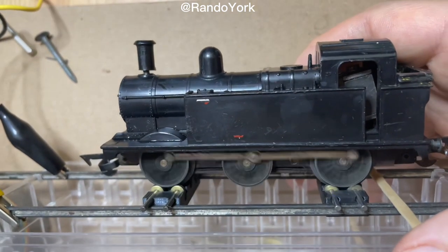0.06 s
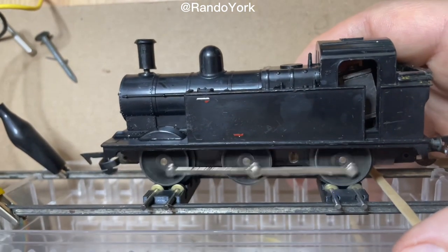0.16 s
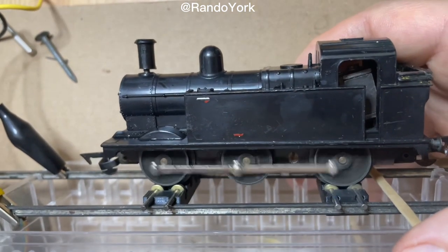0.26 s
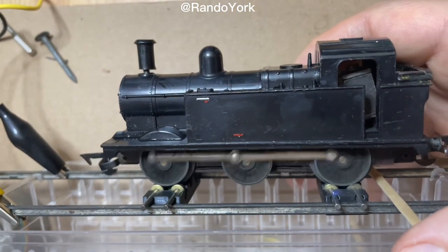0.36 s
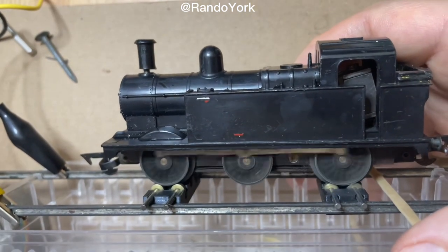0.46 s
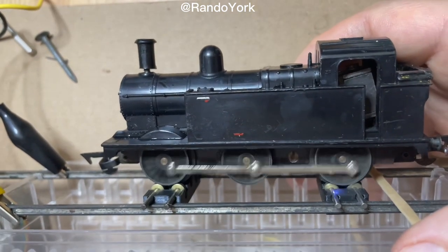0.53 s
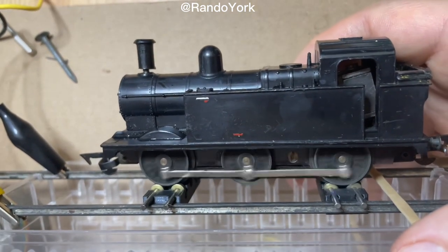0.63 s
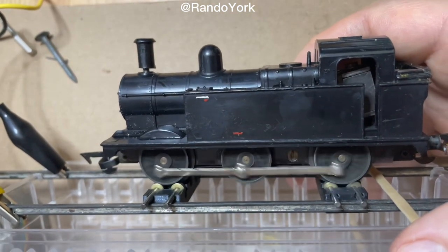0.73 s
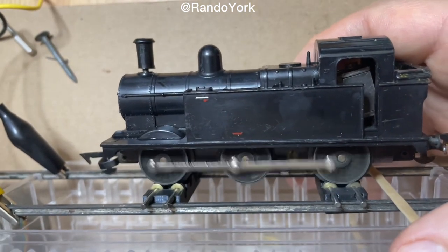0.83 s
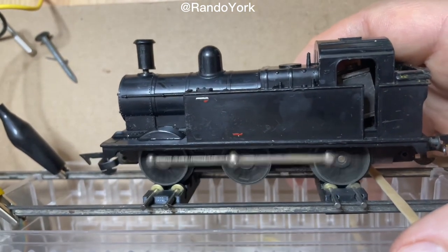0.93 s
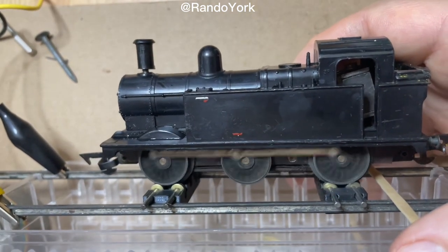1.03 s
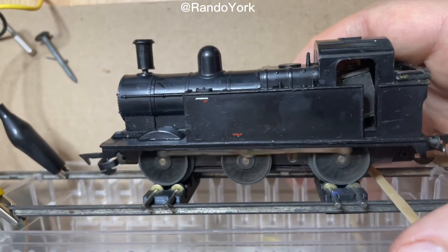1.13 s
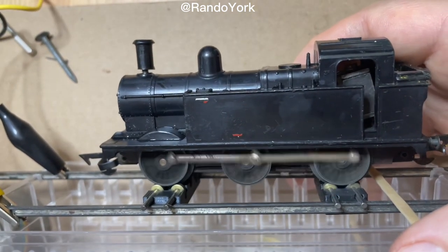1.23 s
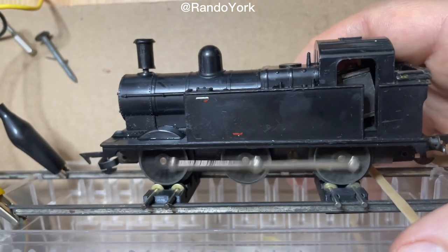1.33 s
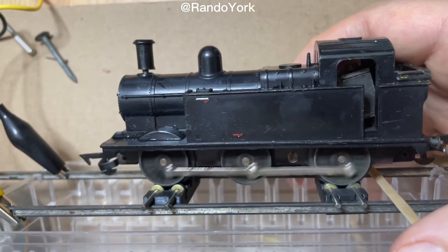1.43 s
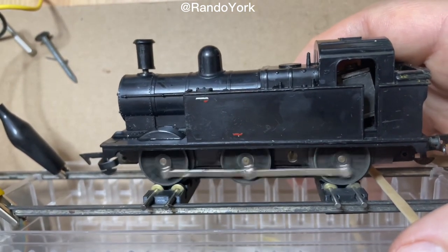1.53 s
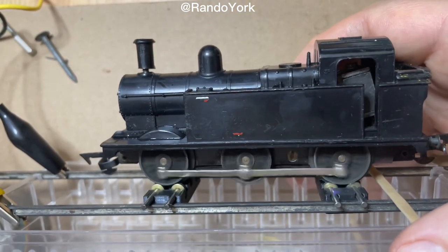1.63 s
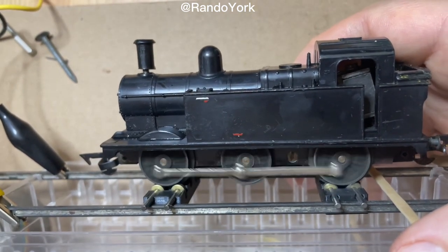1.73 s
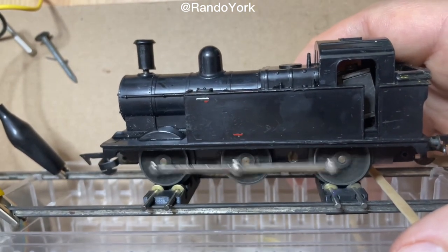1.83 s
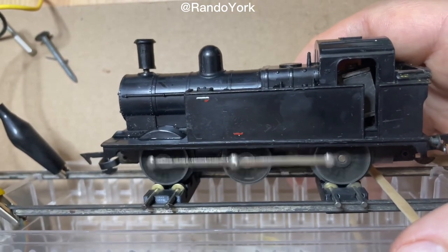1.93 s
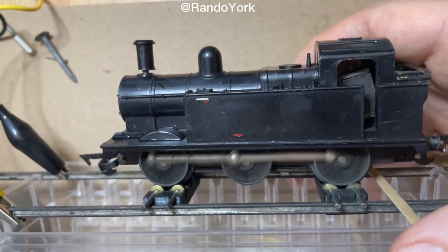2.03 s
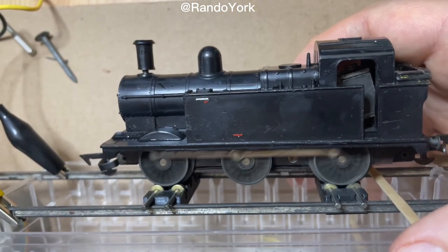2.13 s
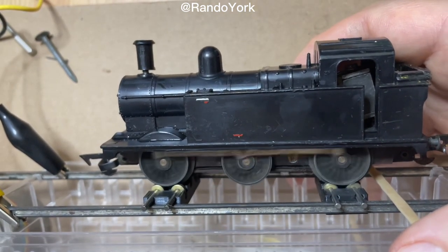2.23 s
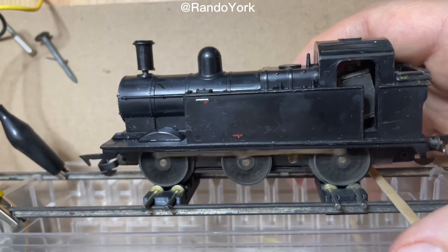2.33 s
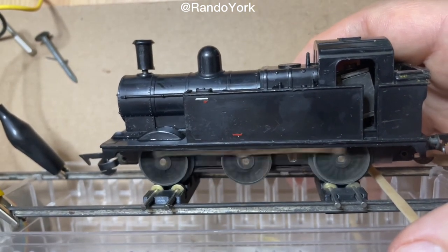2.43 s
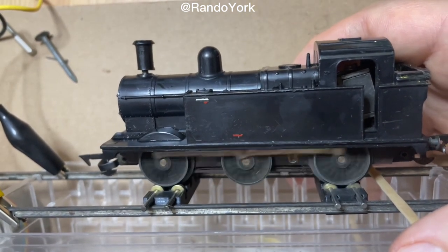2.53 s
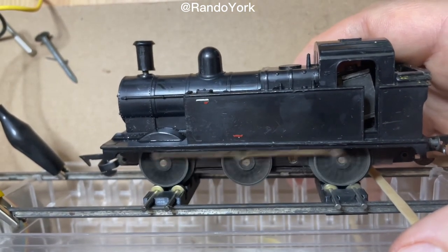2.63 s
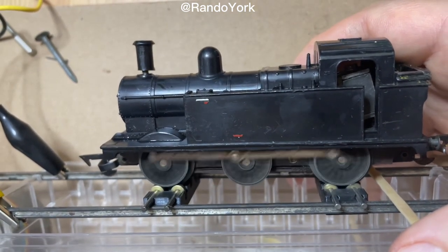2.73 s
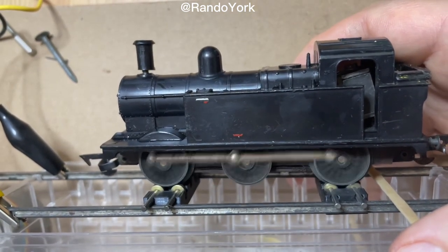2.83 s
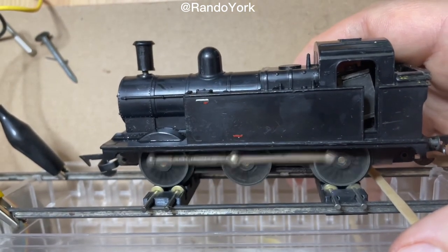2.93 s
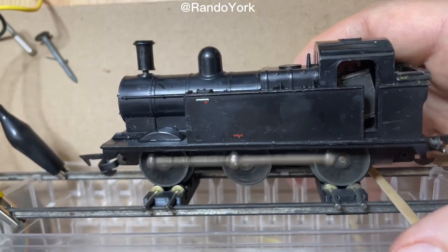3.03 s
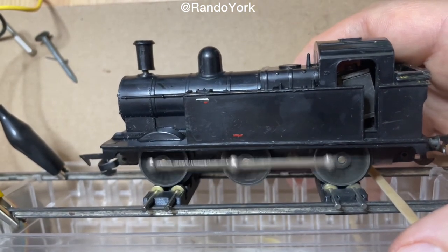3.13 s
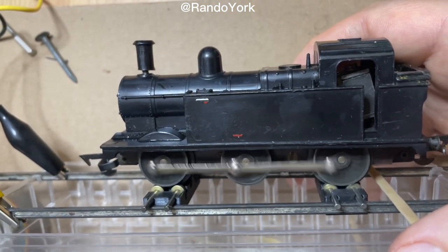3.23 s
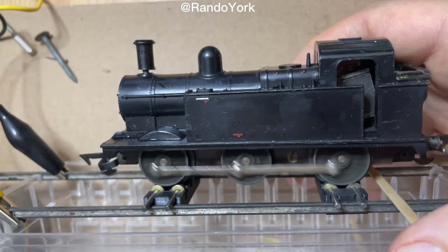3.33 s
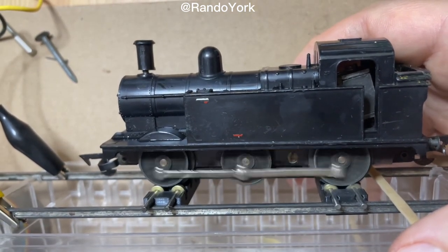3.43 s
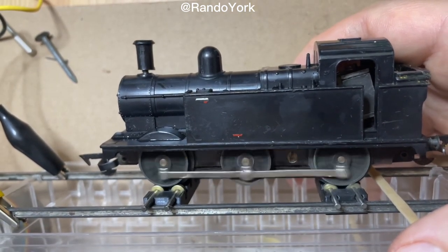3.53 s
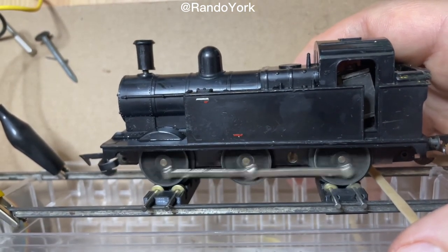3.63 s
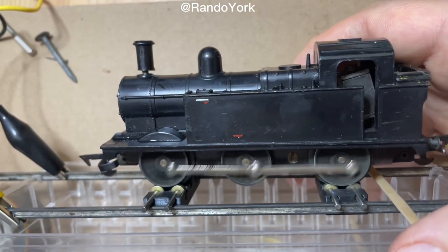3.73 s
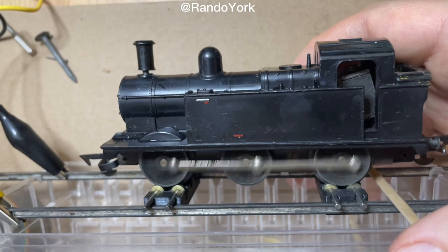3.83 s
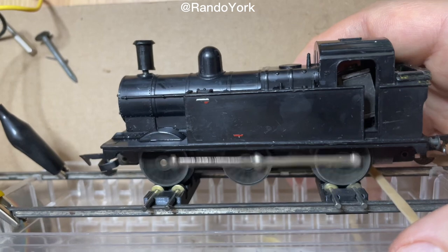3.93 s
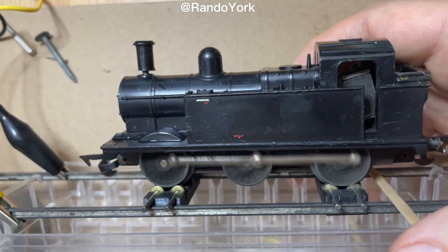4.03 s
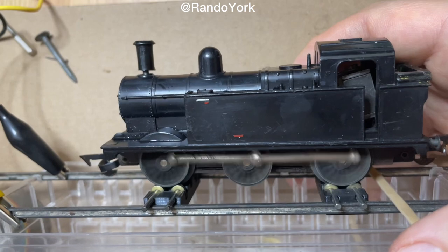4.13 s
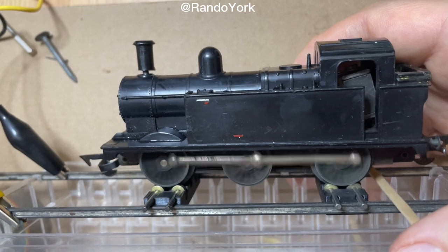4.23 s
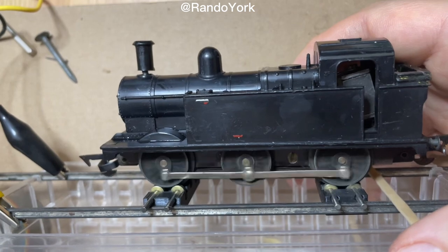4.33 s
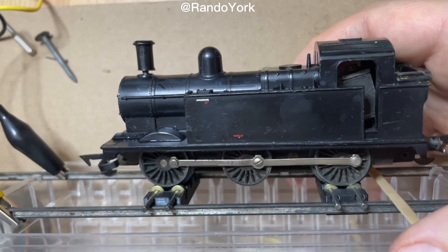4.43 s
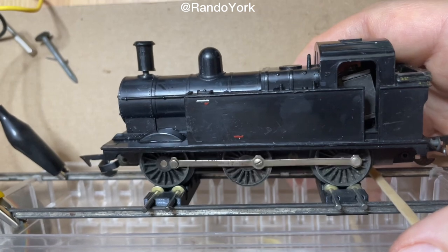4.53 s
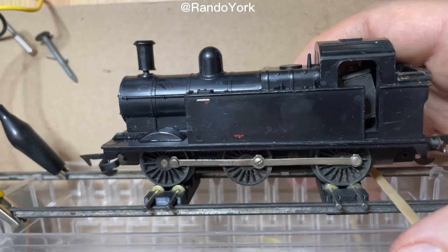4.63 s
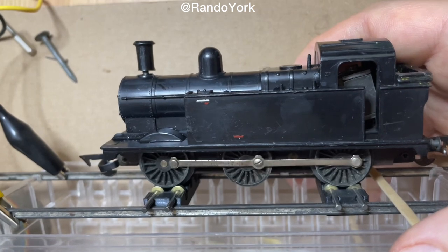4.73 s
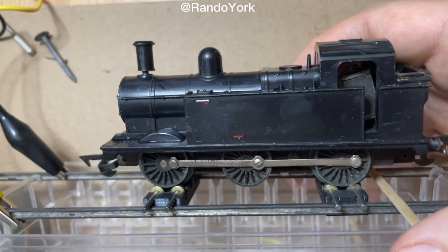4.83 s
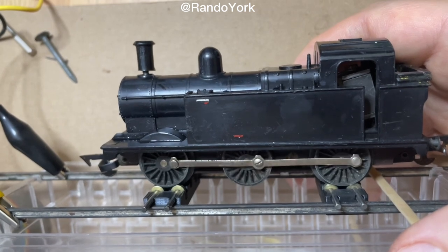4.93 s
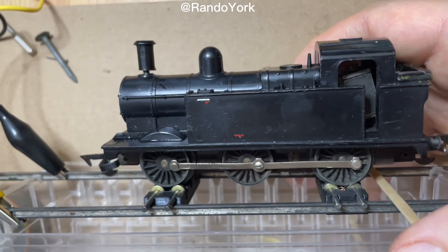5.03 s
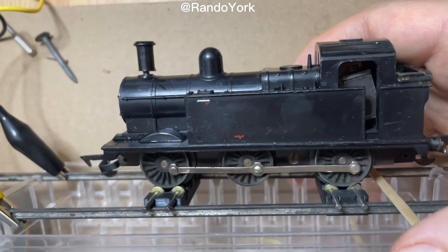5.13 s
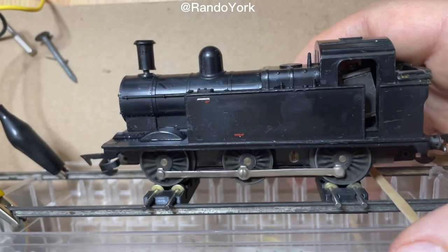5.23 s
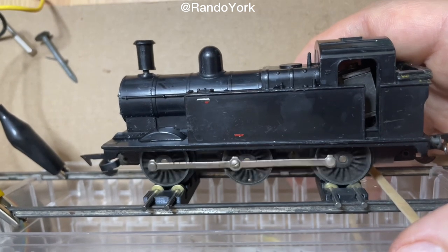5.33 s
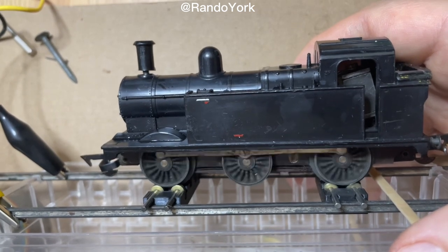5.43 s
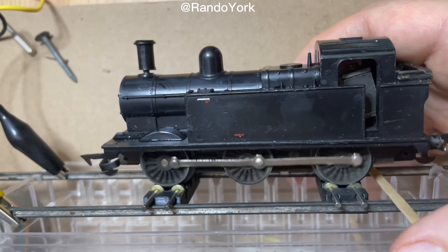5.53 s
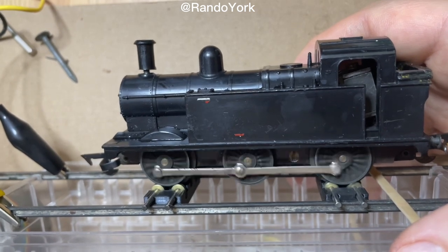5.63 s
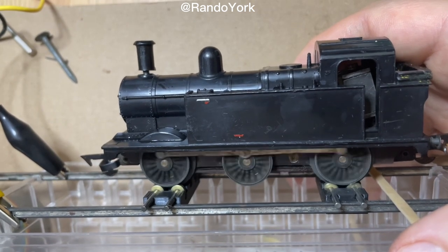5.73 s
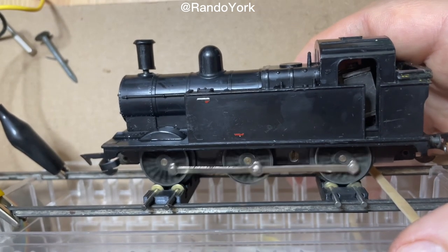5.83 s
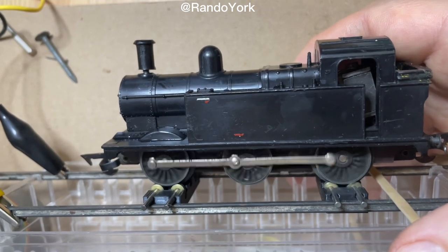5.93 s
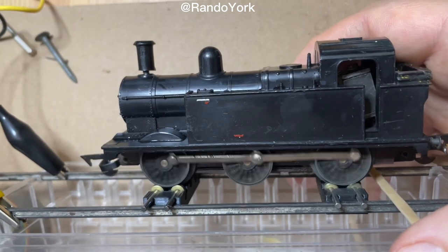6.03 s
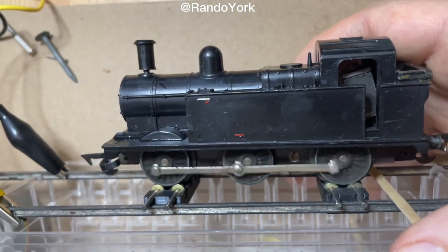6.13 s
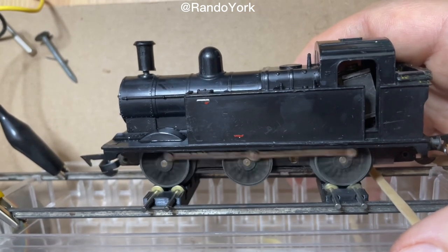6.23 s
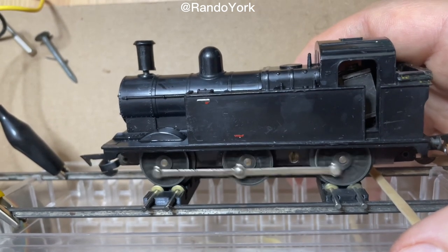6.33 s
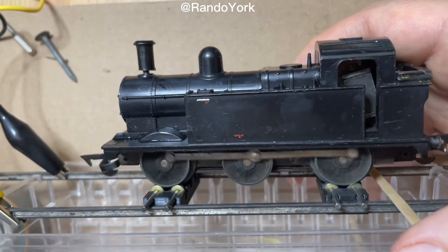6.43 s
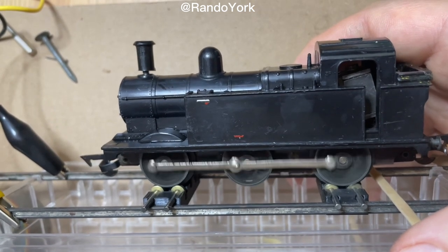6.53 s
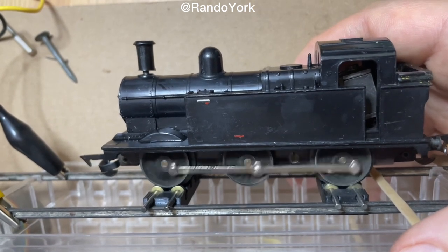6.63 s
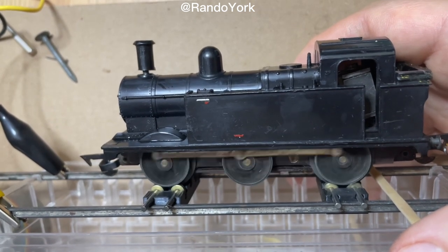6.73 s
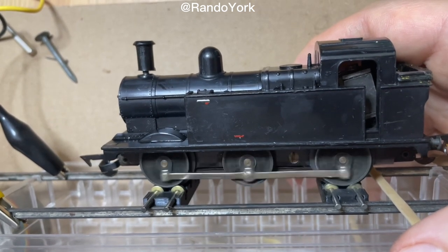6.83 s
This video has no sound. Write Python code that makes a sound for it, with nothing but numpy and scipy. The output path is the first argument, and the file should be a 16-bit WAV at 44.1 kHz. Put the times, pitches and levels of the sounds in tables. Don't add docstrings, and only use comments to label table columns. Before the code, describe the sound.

On an indoor workbench, a small electric model locomotive runs on rollers very close to a stereo phone microphone. Its dry gear rattle and thin motor whine start subdued, then open up and rise slightly. The motor stops abruptly, leaving low rumble and small clicks. After a short groan it restarts backwards, coarse and uneven, with coupling rods knocking as it picks up.

```python
import sys
import numpy as np
from scipy import signal
from scipy.fft import rfft, irfft, next_fast_len
from scipy.io import wavfile
from scipy.ndimage import uniform_filter1d, map_coordinates

SR = 44100
rng = np.random.default_rng(int(sys.argv[2]) if len(sys.argv) > 2 else 0)


def gain_from_db(level_db):
    decades = np.asarray(level_db, float) / 20
    return 10 ** decades


def waveform_to_disk(signal):
    frames = np.transpose(np.atleast_2d(signal))
    scaled = np.clip(frames, -1, 1) * 32767
    samples = np.round(scaled).astype(np.int16)
    wavfile.write(sys.argv[1], SR, samples)


N = 303055

# (time [s], rattle [dB])
RATTLE = [(0, -33), (.4, -31.5), (4.06, -31.5), (4.28, -34.5), (4.378, -48), (4.424, -72), (4.54, -85.5),
          (4.715, -85.5), (4.745, -67), (4.91, -69.5), (4.95, -60), (5.08, -56), (5.2, -42.5), (5.33, -46),
          (5.39, -43), (5.6, -40.5), (6.0, -38), (6.87, -35.5)]
# (time [s], shaft [Hz])
SHAFT = [
    (0, 150),
    (.4, 176),
    (1.2, 180),
    (1.5, 187),
    (2, 187),
    (2.7, 207),
    (3.7, 214),
    (4, 208),
    (4.2, 195),
    (4.4, 160),
]
# (centre [Hz], width [Hz], level [dB])
SHELL = [(1006, 119, 3), (1170, 54, 4), (1471, 70, 3.5), (1662, 103, 1.5), (2030, 37, 0.5),
         (2286, 445, 0.5), (2620, 72, 1), (3093, 133, -1.5), (3403, 190, -3), (3675, 110, -2.5),
         (3830, 34, 0), (4250, 60, -2), (4496, 150, 1.5), (5037, 280, -0.5), (5700, 130, -0.5)]
# (centre [Hz], width [Hz], level [dB])
SHELL_APART = [(1000, 90, 13), (1180, 80, 14), (1430, 70, 7.5), (1900, 120, 0.5), (2650, 150, -47),
               (3300, 250, -4.5), (4200, 200, -9), (5700, 200, -21.5), (6100, 250, -12)]
# (centre [Hz], width [Hz], level [dB])
BOILER = [(473, 36, 1), (430, 60, -11), (510, 40, -9)]
# (centre [Hz], width [Hz], level re boiler [dB])
CAB_TANKS = [(238.6, 69, -8.5), (327, 250, -16.5), (697, 150, -17), (835, 170, -11), (1142, 127, -8.5)]
# (centre [Hz], width [Hz], level [dB])
BRUSH_SPRINGS = [(5956, 190, -0.5), (6093, 82, 0)]
# (frequency [Hz], level [dB])
SUM_COLOUR = [(100, -0.5), (300, -3), (900, -2), (3000, -0.5), (6000, -1.5), (6600, -4.5), (7000, -16.5),
              (7700, -14), (8400, -6.5), (10000, -4.5), (13000, -10), (14100, -22.5), (15950, -19.5),
              (16200, -120)]
# (frequency [Hz], level [dB])
DIFFERENCE_COLOUR = [(100, -10.5), (300, -12.5), (900, -10), (3000, 2), (4900, -7), (5600, 0), (7200, 3.5),
                     (9200, -1), (10600, -31.5), (11700, -20), (13200, -7.5), (14500, -2.5), (15800, -15),
                     (16300, -120)]
# (frequency [Hz], likeness [0-1], lead [rad])
PORT_LIKENESS = [(180, .95, 1.15), (500, 0.94, 0.58), (610, .65, -2), (805, 0.3, -1.5), (1050, 0.3, 0.36),
                 (1480, 0.5, 1.7), (2040, 0.3, -0.35), (2600, .45, .3), (3200, 0.97, 1.2), (3900, 0.5, .1),
                 (5000, 0, 0), (6040, 1, -0.77), (6500, 0.2, -0.39), (8650, 0.17, 1.6)]
# (frequency [Hz], density [dB per Hz])
RUMBLE = [(20, -43), (30, -7), (50, 5.5), (85, 6), (150, -7), (300, -21), (600, -32), (1100, -41),
          (1600, -52.5), (6000, -65), (16000, -82.5)]
# (time [s], ripple depth [0-1], coarseness [dB])
LOAD = [
    (0, 0.21, 0.5),
    (4.4, 0.24, 0.5),
    (4.8, 0.3, -5),
    (5.08, 0.5, 8.5),
    (5.2, 0.64, 0.8),
    (5.9, 0.34, 1.5),
    (6.87, 0.37, -1.5),
]
# (time [s], peak [dB], hollow part [dB], thud part [dB], hollow ring [Hz])
SWITCH = [(4.362, -30, -14, -28, 473), (4.38, -27, -14, -23, 487), (4.401, -38, -15, -25, 487),
          (4.4236, -36.5, -16.5, -13, 487), (4.481, -50.5, 5.5, -10, 1000), (4.51, -62, -3, 23, 425),
          (4.6114, -67.5, 0, 24, 400), (4.638, -76, 1, 28, 422), (4.704, -52, -14, -15, 433),
          (4.7234, -62, 9, -4, 700), (4.7529, -27.5, -2, -10, 567), (4.775, -31, -16, -3, 1000),
          (4.7963, -37.5, -11, 1.5, 622), (4.821, -60, -5, 18, 500), (4.925, -29, -25, -26, 520),
          (4.9351, -28, -17.5, -30.5, 470), (5.019, -44, -7, -8, 700)]
# (time [s], peak [dB], hollow ring [Hz])
RODS = [(5.0472, -50, 566), (5.0864, -34, 1040), (5.097, -30, 1030), (5.109, -26, 850), (5.1232, -26, 1160),
        (5.1647, -30, 486), (5.172, -21.5, 1100), (5.189, -22, 1100), (5.2604, -26, 475),
        (5.338, -22.5, 1180), (5.3764, -22, 460), (5.5277, -27.5, 490), (5.5469, -17.5, 1170),
        (5.6087, -19, 477), (5.8487, -19, 464), (5.8883, -18, 1000), (6.0857, -16, 1060),
        (6.1475, -22, 475), (6.2687, -33, 488), (6.458, -21.5, 426)]
# (time [s], hold [s], level [dB])
STALL = [
    (4.3, 0.047, -42),
    (4.755, .04, -43.5),
    (4.85, 0.2, -48.5),
    (5.1, 0.36, -59),
]
# (time [s], hold [s], level [dB])
CRAWL = [
    (4.3, 0.068, -44),
    (4.755, 0.048, -56),
    (4.93, 0.08, -63.5),
    (5.14, 0.34, -52.5),
]
# (time [s], hold [s], level [dB])
SURGES = [(.24, .09, 6), (.92, .03, 0), (1.7, .06, 4), (5.61, .04, 2), (5.72, .06, 6), (5.97, .06, 0),
          (6.32, .05, 0), (6.48, .03, 3), (6.65, .03, 1), (6.72, .03, 1), (6.82, .04, 3)]
# (forwards [dB], standing [dB], backwards [dB])
SWELL_DB = [1.5, 1, 1.5]

RIPPLE_HZ = 100.0
STOP_S, AWAY_S = 4.4, 5.16
BOOM_DB, BUZZ_DB = [-7, 0, -3], [-7.5, -29, -2]
BENCH_DB, SHAKE_DB = [-52.5, -54.5, -50.5], 1
RISE_DB_PER_S, FALL_DB_PER_S = 800.5, 250
ROD_HOLLOW_DB, ROD_THUD_DB, KNOCK_T60_S, THUD_T60_S = -19.5, -24, 0.045, 0.053
POLE_DB, POLE_POWER = -19, 3
UNBALANCE_DB, UNBALANCE_POWER = -13.5, 5
DUCKED_DB, OPEN_S, OPEN_TIME_S = -18.5, 1.214, 0.36


def unit(x):
    return x / np.sqrt(np.mean(x ** 2) + 1e-20)


def along(points, hz, column=1):
    table = np.transpose(points)
    return np.interp(np.log(hz + 1), np.log(table[0] + 1), table[column])


def curves(rows):
    s, *cols = np.transpose(sorted(rows))
    return [np.interp(np.arange(N) / SR, s, c) for c in cols]


def stage(values):
    times_s = [STOP_S - .05, STOP_S, AWAY_S - .03, AWAY_S]
    return np.interp(np.arange(N) / SR, times_s, np.array(values)[[0, 1, 1, 2]])


def held(rows):
    t = np.arange(N) / SR
    levels_db = []
    for s, hold_s, db in rows:
        rise_db = RISE_DB_PER_S * np.maximum(s - t, 0)
        fall_db = FALL_DB_PER_S * np.maximum(t - s - hold_s, 0)
        levels_db.append(db - rise_db - fall_db)
    return gain_from_db(np.max(levels_db, axis=0))


def wobble(rate_hz):
    knots = rng.standard_normal(int(N * rate_hz / SR) + 4)
    return map_coordinates(knots, [np.arange(N) * rate_hz / SR])


def filtered(x, response):
    m = next_fast_len(N + SR // 2)
    return irfft(rfft(x, m) * response(np.fft.rfftfreq(m, 1 / SR)), m)[..., :N]


def ringing(modes, between_db):
    def peak(f, c, w):
        return (f * w) ** 2 / ((c * c - f * f) ** 2 + (f * w) ** 2 + 1)

    def response(f):
        power = sum(gain_from_db(2 * db) * peak(f, c, w) ** 2 for c, w, db in modes)
        return np.sqrt(gain_from_db(2 * between_db) + power)
    return response


def ports(push, near, far):
    def alike(hz):
        return np.clip(along(PORT_LIKENESS, hz), 0, .99)
    same = filtered(push[0], lambda hz: alike(hz) * np.exp(1j * along(PORT_LIKENESS, hz, column=2)))
    apart = same + filtered(push[1], lambda hz: np.sqrt(1 - alike(hz) ** 2))
    return np.array([filtered(push[0], near), filtered(apart, far)])


def teeth(ripple, coarse_db):
    phase = (np.arange(N) / SR * RIPPLE_HZ + .13 + .04 * wobble(40)) % 1
    kick = np.exp(-phase / .4) * (1 - np.exp(-phase / .08)) * gain_from_db(2.5 * wobble(70))
    slack_db = coarse_db * (.5 * wobble(7) + 1.0 * wobble(30) + 0.66 * wobble(150) + 1.17 * wobble(900))
    gate = (1 - ripple + ripple * kick / np.mean(kick)) * gain_from_db(slack_db)
    gate /= np.sqrt(np.abs(uniform_filter1d(gate ** 2, SR // 8)))
    return gate * rng.standard_normal((2, N))


def bench():
    level_db = stage(BENCH_DB) + SHAKE_DB * wobble(9) + wobble(3)
    rumble = filtered(rng.standard_normal((2, N)), lambda hz: gain_from_db(along(RUMBLE, hz)))
    return gain_from_db(level_db) * unit(rumble) * gain_from_db([[0], [-16]])


def groan():
    upper = ringing([(660, 480, 0)], between_db=-53)
    lower = ringing([(273, 75, 0.0068)], between_db=-56)
    worm = gain_from_db(13) * ports(teeth(0.25, 1.2), upper, upper) * gain_from_db([[0], [-6]])
    wheels = gain_from_db(25.0) * ports(teeth(0.23, 0.73), lower, lower) * gain_from_db([[0], [-9]])
    return held(STALL) * worm + held(CRAWL) * wheels


def knocks():
    crack, ring, thud = np.zeros((3, 2, N + SR))
    t = np.arange(SR // 8) / SR
    rods = [(s, db, ROD_HOLLOW_DB, ROD_THUD_DB, hz) for s, db, hz in RODS]
    for s, db, hollow_db, thud_db, ring_hz in SWITCH + rods:
        at = slice(round(s * SR), round(s * SR) + len(t))
        burst = rng.standard_normal((2, 2, len(t))) * (1 - np.exp(-t / 0.00059))
        ring_db = db + hollow_db
        tone = np.sin(2 * np.pi * ring_hz * t)
        crack[:, at] += (1 + 0.74 * np.exp(-t / 0.0016)) * gain_from_db(db - 60 * t / KNOCK_T60_S) * burst[0]
        ring[0, at] += gain_from_db(ring_db + 4.5 - 60 * t / (3.1 * KNOCK_T60_S)) * tone
        ring[:, at] += gain_from_db(ring_db + 18.5 - 60 * t / (1.1 * KNOCK_T60_S)) * burst[1]
        thud[0, at] += gain_from_db(db + thud_db - 60 * t / THUD_T60_S) * np.sin(2 * np.pi * 90 * t)

    def hollow(hz):
        return gain_from_db(along([(200, -13), (350, 5), (1100, -7), (1800, -24)], hz))
    body = ringing(SHELL + BRUSH_SPRINGS, between_db=-9)
    shell = ports(crack[:, :N], body, ringing(SHELL_APART, between_db=-13))
    return gain_from_db(-2.0) * shell + gain_from_db(-1) * ports(ring[:, :N], hollow, hollow) + gain_from_db(2.5) * thud[:, :N]


def armature():
    (shaft_hz,), (rattle_db,) = curves(SHAFT), curves(RATTLE)
    speed = shaft_hz / 200
    turns = 2 * np.pi * np.cumsum(shaft_hz * (1 + .004 * wobble(12))) / SR
    once = gain_from_db(UNBALANCE_DB + 0.5 * wobble(26)) * speed ** UNBALANCE_POWER
    once = once * np.sin(turns + np.array([[0], [.9]]))
    poles = gain_from_db(POLE_DB + 3 * wobble(25)) * np.sin(3 * turns + .3 * wobble(30))
    poles *= 1 + 1.3 * np.sin(2 * np.pi * RIPPLE_HZ * np.arange(N) / SR)
    for order, db in [(2, -7), (4, 1), (7, -2)]:
        poles += gain_from_db(POLE_DB + db + 3 * wobble(20)) * np.sin(order * turns + .4 * wobble(30))
    whine = once * gain_from_db([[0], [-6]]) + speed ** POLE_POWER * poles * gain_from_db([[0], [-3]])
    return stage([1, 0, 0]) * gain_from_db(rattle_db + 1.0) * whine


def gears():
    rattle_db, = curves(RATTLE)
    boom_db = stage(BOOM_DB) + stage(SWELL_DB) * wobble(9)
    buzz_db = stage(BUZZ_DB) + stage(SWELL_DB) * wobble(12)
    ripple, coarse_db = np.clip(curves(LOAD), 0, [[1], [3]])
    body, body_apart = ringing(SHELL, between_db=-6), ringing(SHELL_APART, between_db=-7.5)
    shell = ports(teeth(ripple, coarse_db), body, body_apart)
    cavity = ringing(BOILER + CAB_TANKS, between_db=-45.5)
    hollow = ports(teeth(.5 * ripple, 1.47 * coarse_db), cavity, cavity)
    hollow = hollow + held(SURGES) * filtered(hollow, ringing([(442, 40, 0)], between_db=-34))
    springs = ringing(BRUSH_SPRINGS, between_db=-46.0)
    buzz = ports(teeth(np.clip(4.0 * ripple, 0, 1), 2.0 * coarse_db), springs, springs)
    return gain_from_db(rattle_db) * (gain_from_db(11.5) * shell + gain_from_db(boom_db + 28.5) * hollow + gain_from_db(buzz_db + 19.5) * buzz)


def scene():
    def colour(hz):
        dip = 1 - .7 / (1 + ((hz - 562) / 30) ** 2)
        return gain_from_db([along(SUM_COLOUR, hz), along(DIFFERENCE_COLOUR, hz)]) * dip
    both, apart = bench() + groan() + armature() + filtered(gears() + knocks(), colour)
    return np.array([both + apart, both - apart])


def thinned(dry, margin_db, faint_db, chance_db, from_hz):
    pair = np.array([dry[0] + dry[1], dry[0] - dry[1]]) / 2
    hz, t, z = signal.stft(pair, SR, 'cosine', nperseg=2048, noverlap=1024)
    power = np.mean(np.abs(z[:, :1024].reshape(2, 128, 8, -1)) ** 2, axis=2)
    level_db = 10 * np.log10(uniform_filter1d(power, size=2, axis=1) + 1e-20)
    other_db = np.maximum(level_db, np.roll(level_db, shift=2, axis=1))[::-1]
    body_db = 10 * np.log10(power[0, 6:36].mean(axis=0) + 1e-20)
    luck = unit(uniform_filter1d(rng.standard_normal((2, 32, len(t))), size=2, axis=2))
    masked = level_db < other_db - margin_db + chance_db * np.repeat(luck, 4, axis=1)
    faint = level_db < body_db - faint_db + 3 * rng.standard_normal(power.shape)
    knock_s = [row[0] for row in SWITCH[3:] + RODS[:15]]
    calm = np.min(np.abs(t[:, None] - knock_s), axis=1) > .02
    empty = np.repeat((masked | faint) & calm, 8, axis=1)
    z[:, :1024] *= 1 - empty * (hz[:1024, None] > from_hz)
    both, apart = signal.istft(z, SR, 'cosine', nperseg=2048, noverlap=1024)[1][:, :N]
    return np.array([both + apart, both - apart])


def top_cut(x):
    return signal.sosfilt(signal.butter(12, 16630, fs=SR, output="sos"), x)


def record(dry):
    closed = np.exp(-np.maximum(np.arange(N) / SR - OPEN_S, 0) / OPEN_TIME_S)
    opened = dry * gain_from_db(DUCKED_DB * closed)
    lean = filtered(opened, lambda hz: (1j * hz / (36 + 1j * hz)) ** 3)
    mix = thinned(lean, margin_db=10.5, faint_db=19, chance_db=3.5, from_hz=[[[6000]], [[1400]]])
    return top_cut(mix)


dry = scene()
out = record(dry)
waveform_to_disk(out)
```